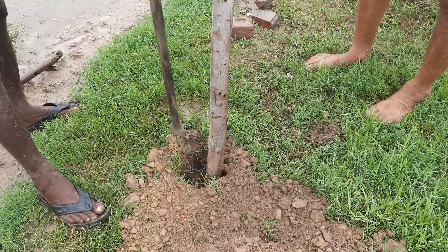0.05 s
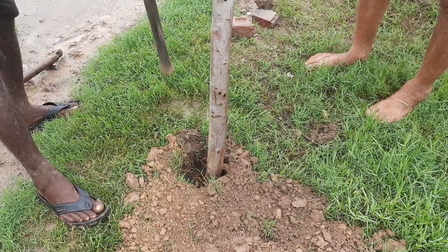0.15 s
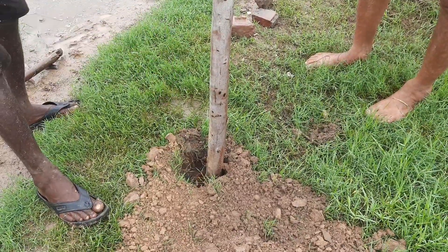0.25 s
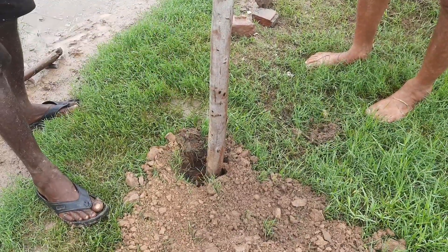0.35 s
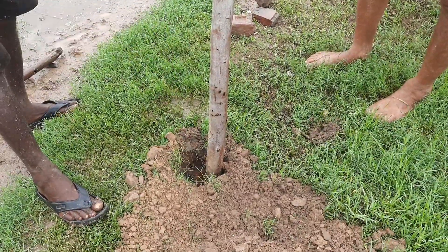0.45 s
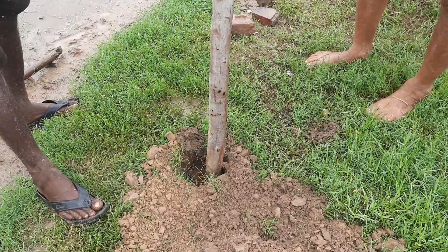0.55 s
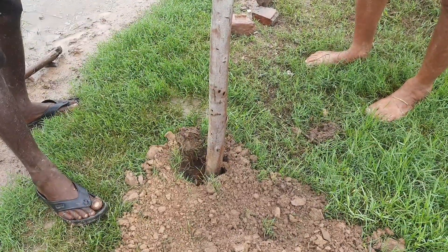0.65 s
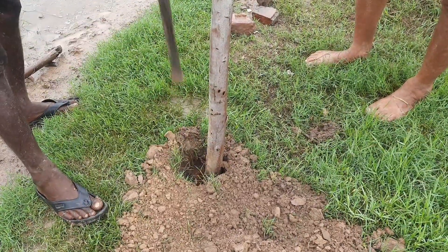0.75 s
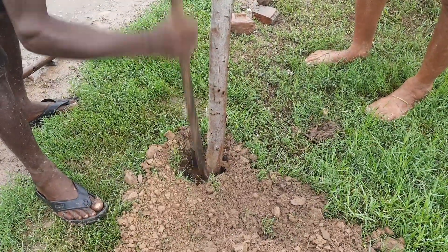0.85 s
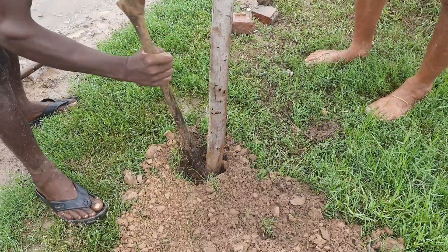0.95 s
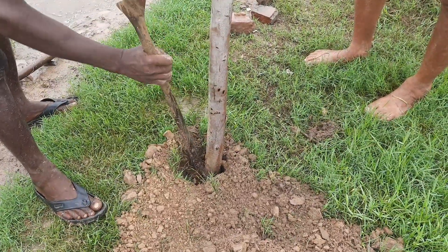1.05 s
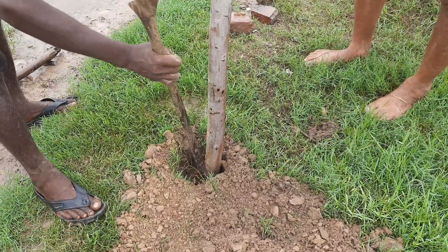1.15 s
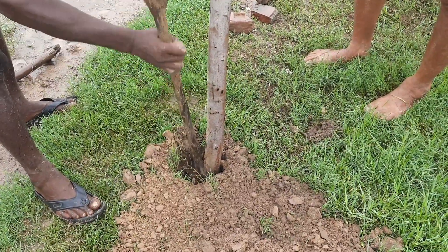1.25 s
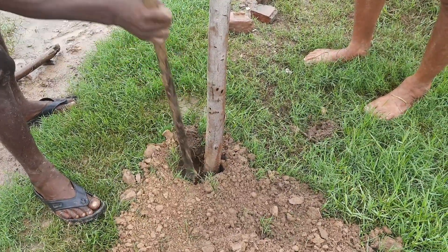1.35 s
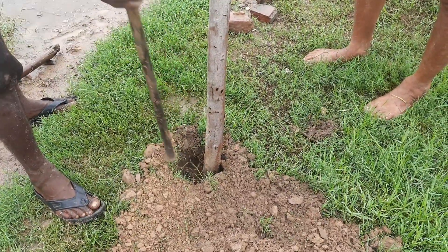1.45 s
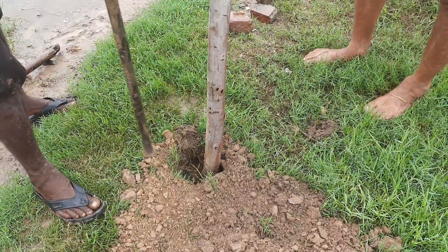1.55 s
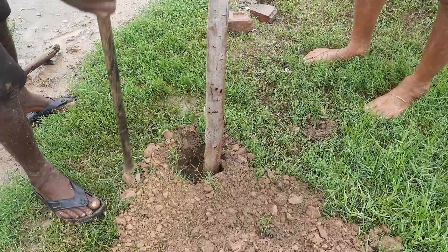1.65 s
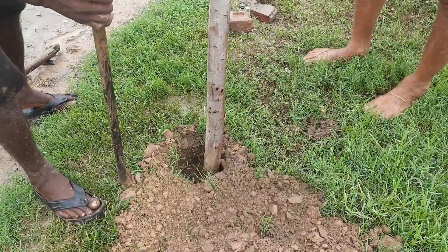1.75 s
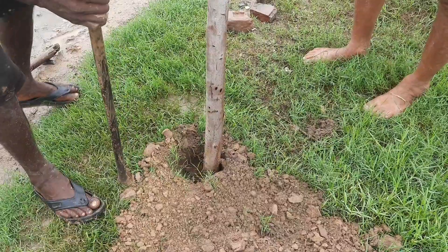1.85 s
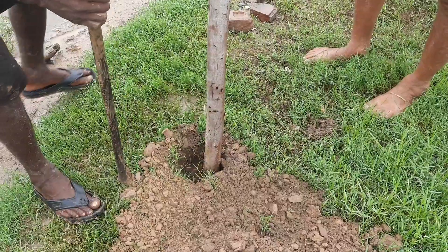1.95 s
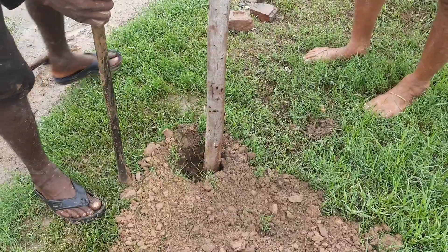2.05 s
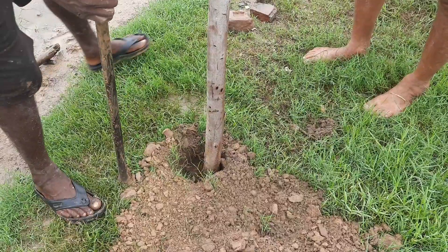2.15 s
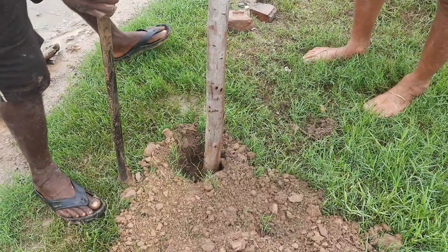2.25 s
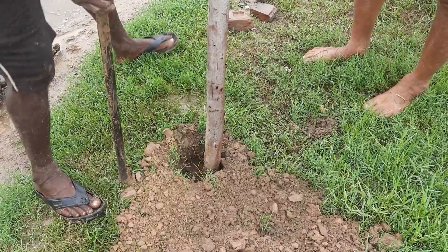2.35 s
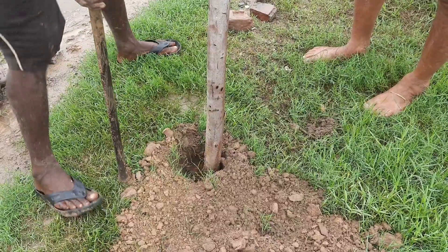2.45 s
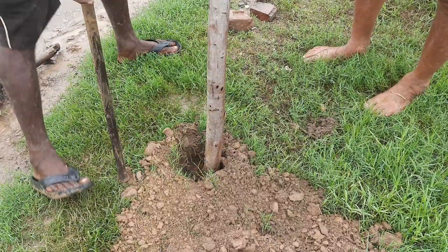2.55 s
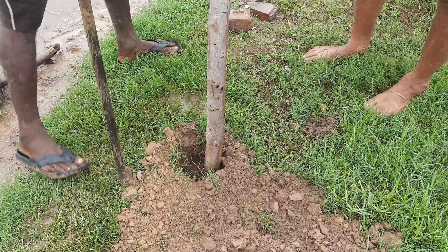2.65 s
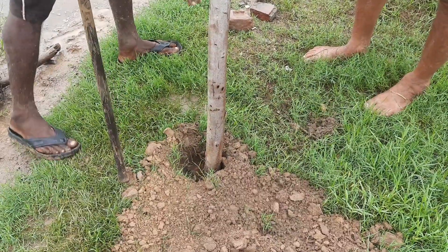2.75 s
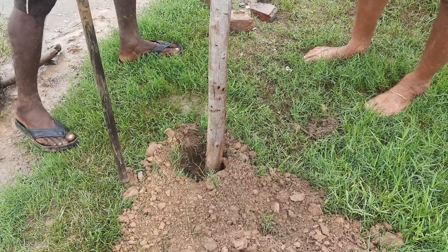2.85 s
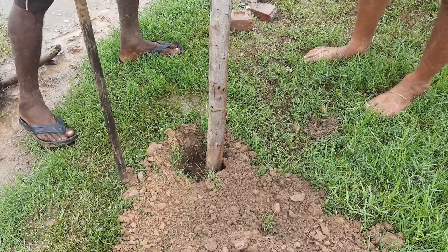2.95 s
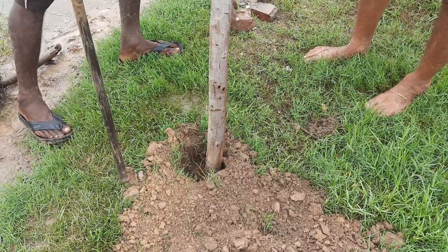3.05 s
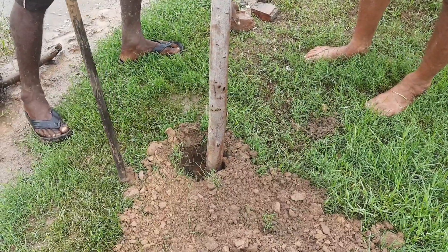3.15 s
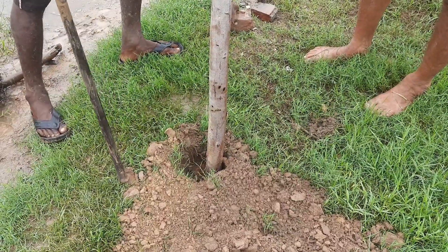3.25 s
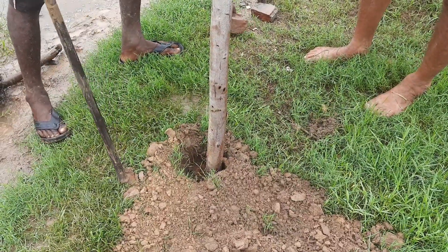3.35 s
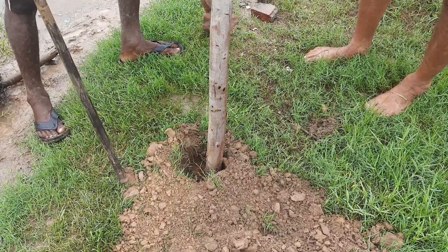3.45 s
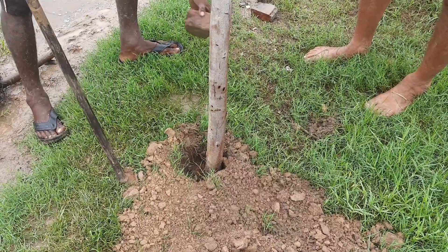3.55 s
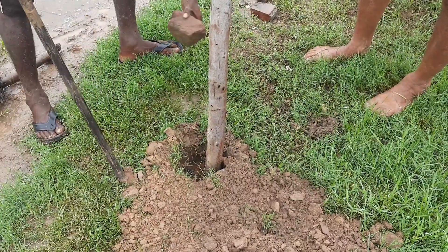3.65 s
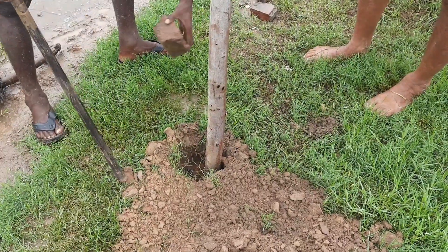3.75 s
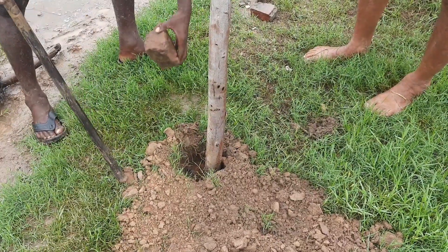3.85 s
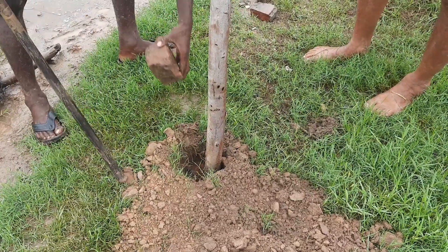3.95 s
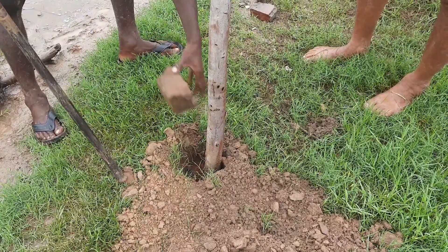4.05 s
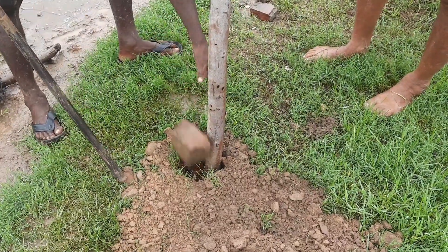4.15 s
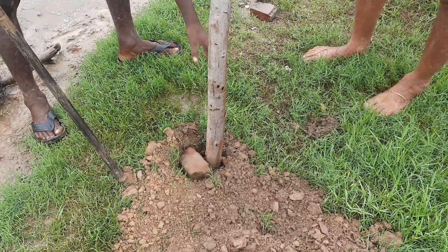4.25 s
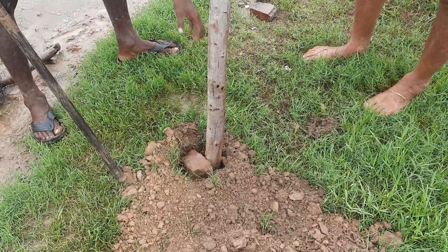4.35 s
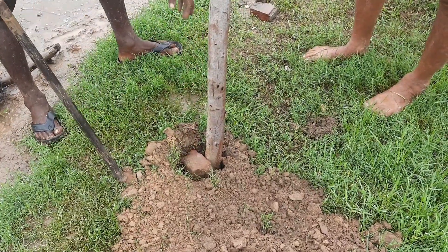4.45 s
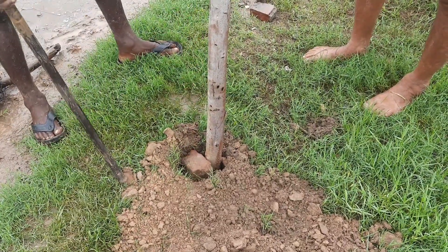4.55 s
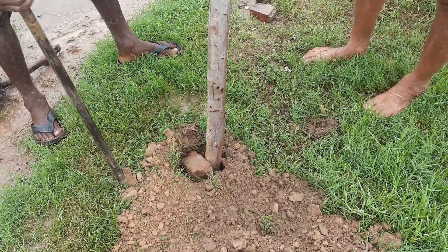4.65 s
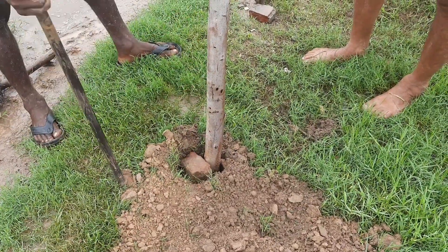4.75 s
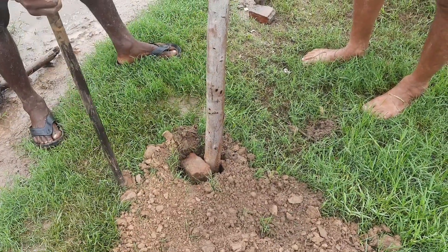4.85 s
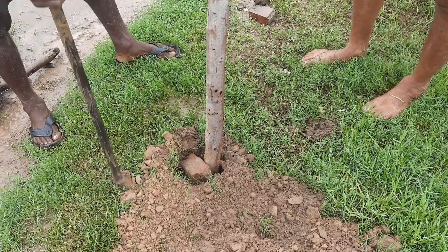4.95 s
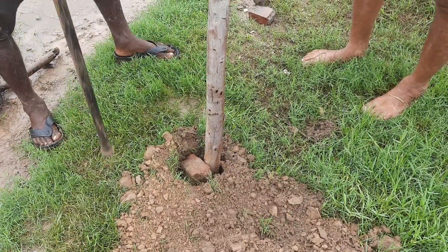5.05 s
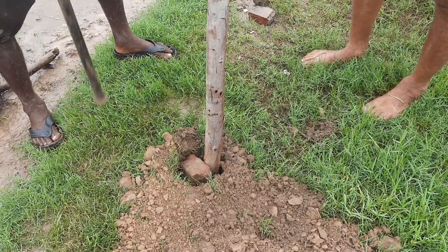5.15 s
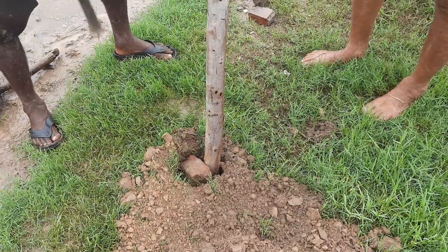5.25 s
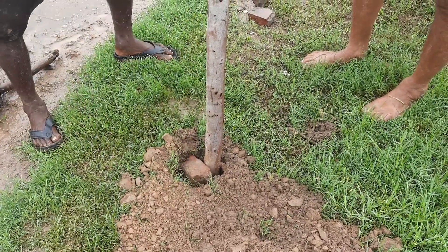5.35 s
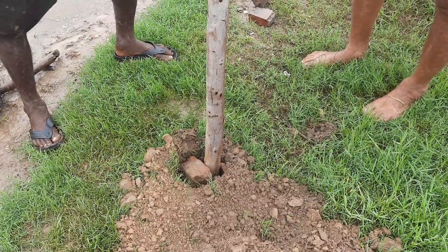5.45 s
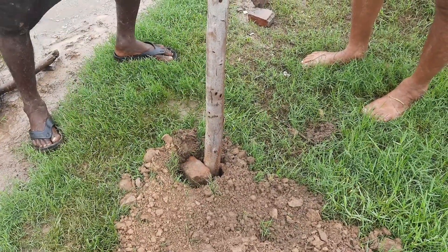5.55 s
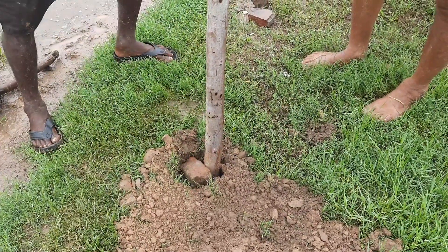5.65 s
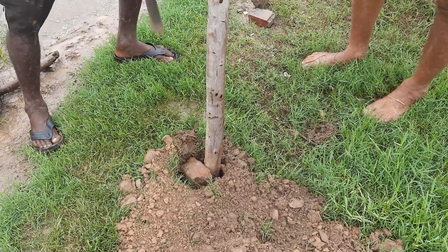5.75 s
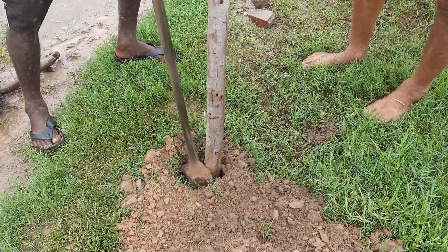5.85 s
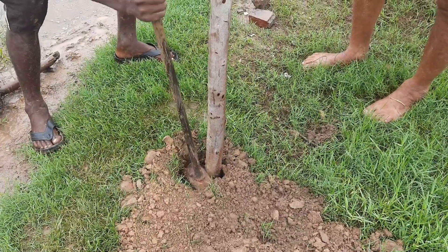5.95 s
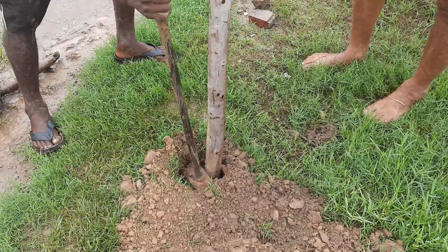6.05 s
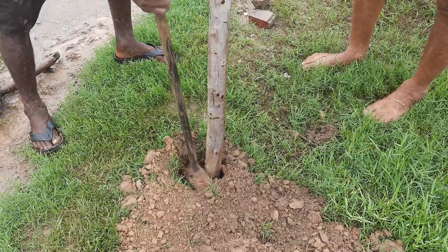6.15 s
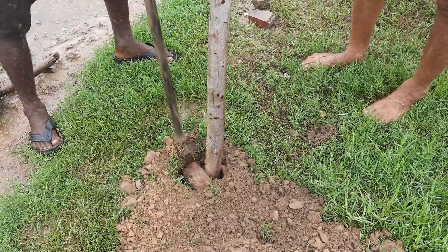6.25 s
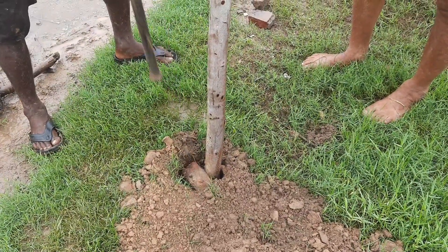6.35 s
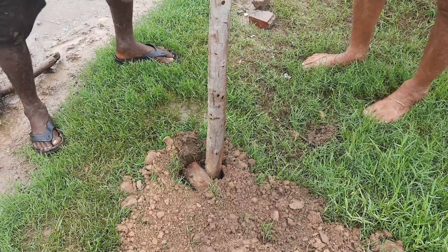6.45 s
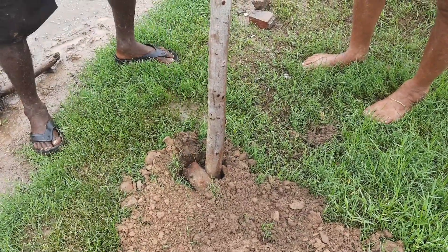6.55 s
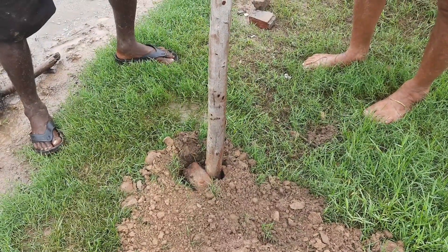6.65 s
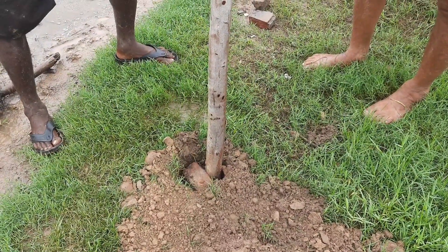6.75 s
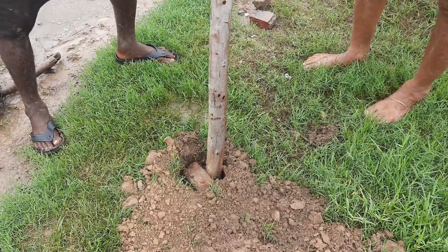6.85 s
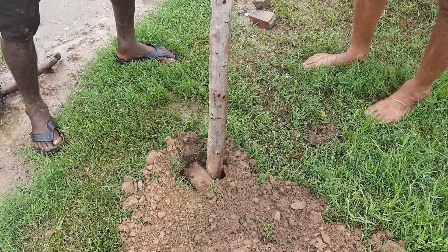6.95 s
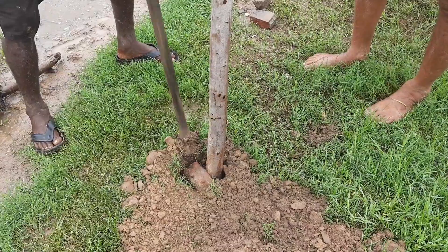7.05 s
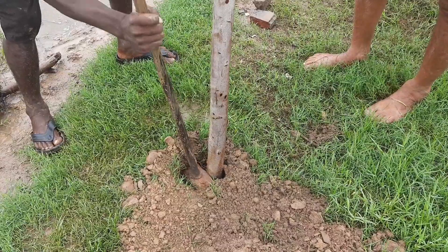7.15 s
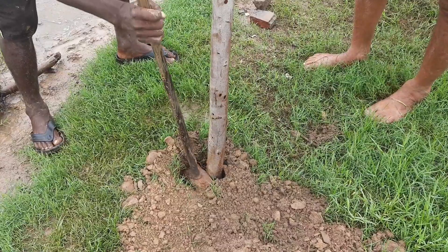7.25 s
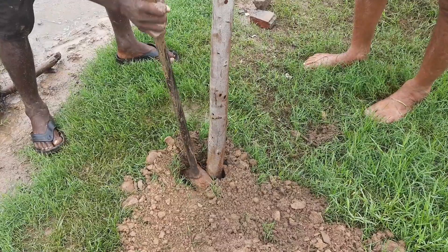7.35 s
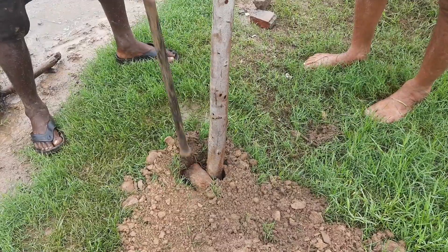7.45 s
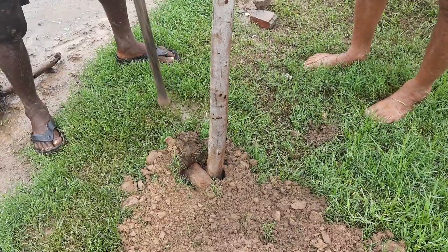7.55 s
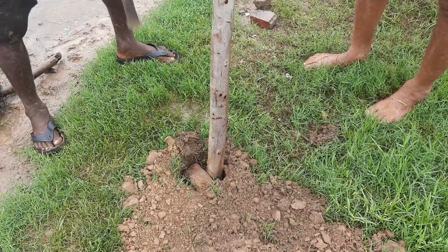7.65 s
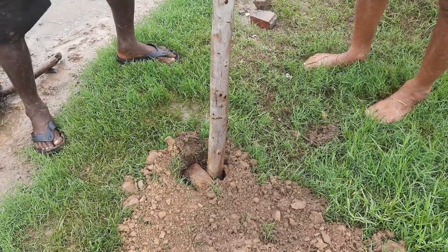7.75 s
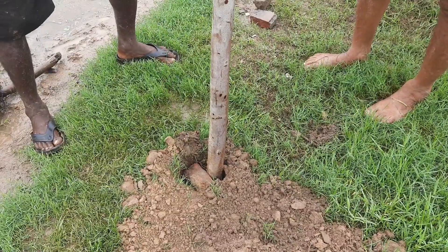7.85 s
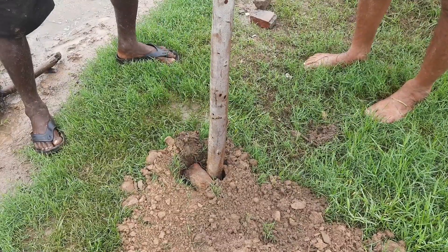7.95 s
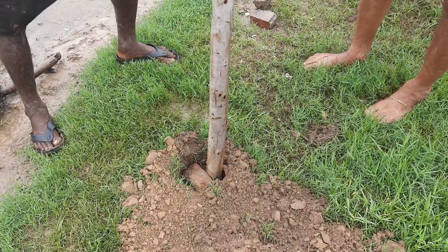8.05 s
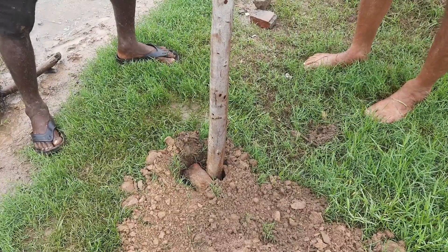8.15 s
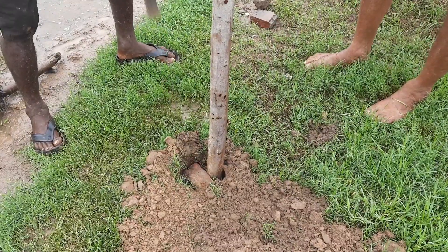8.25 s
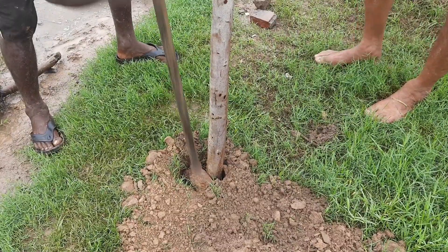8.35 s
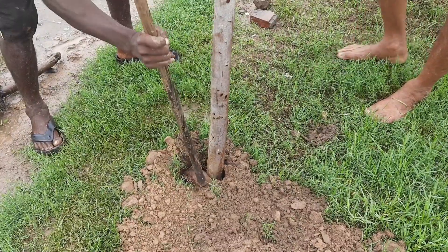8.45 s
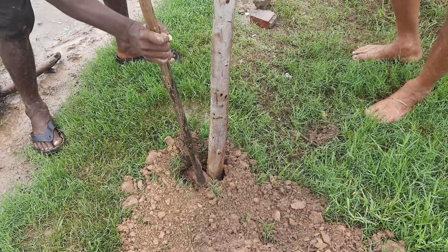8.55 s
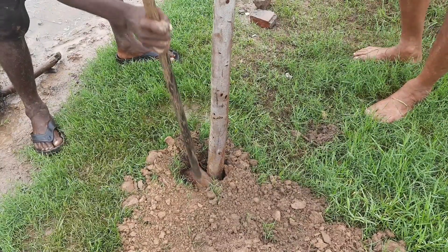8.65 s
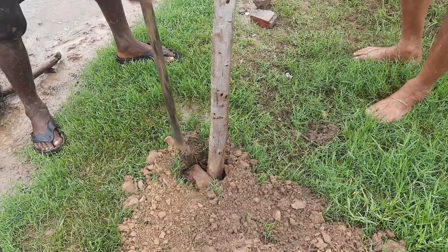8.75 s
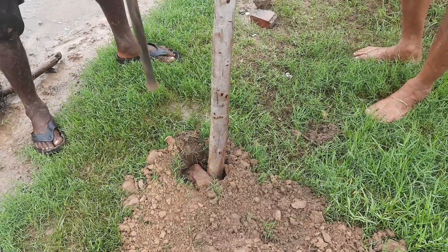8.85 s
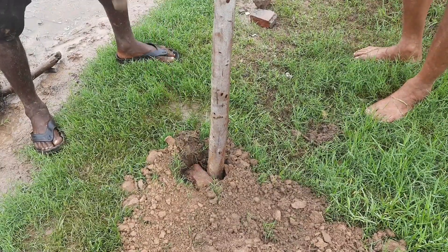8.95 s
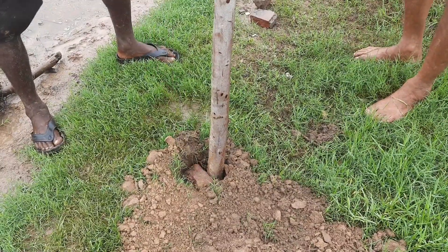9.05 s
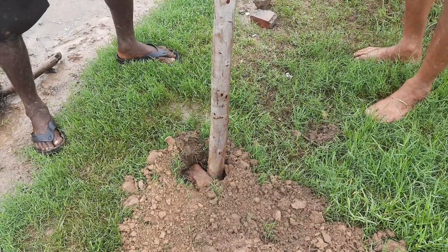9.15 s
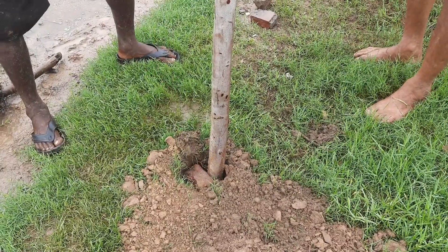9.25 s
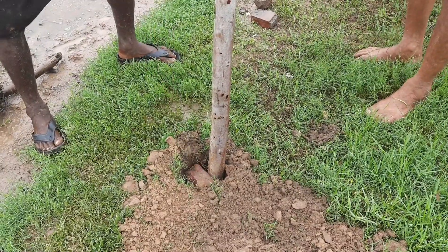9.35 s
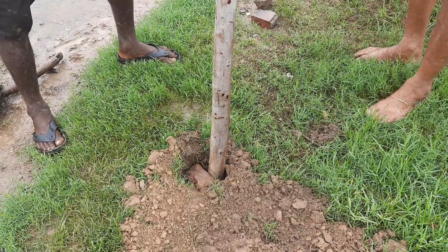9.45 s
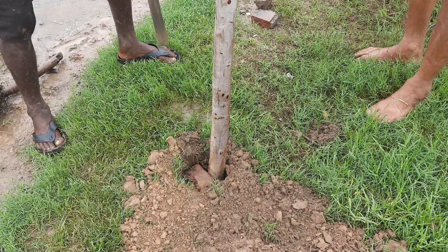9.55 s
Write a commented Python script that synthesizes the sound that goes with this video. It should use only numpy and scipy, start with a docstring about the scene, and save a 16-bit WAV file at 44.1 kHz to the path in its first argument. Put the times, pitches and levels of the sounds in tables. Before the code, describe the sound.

Close to the microphone on an open grassy field, a bird's short, nasal, arched alarm calls repeat about every 0.4 seconds from start to end, near 1.2 kHz with bright overtones. Light grass rustle and scuffs open the scene. At 0.95 an iron bar rams into soil: a deep thump, gritty crunch and short bright ring. Between about 1.7 and 4 feet brush the turf, low rumble swells near 3, and a thin far whistle sinks from 2.7 to 3.7. At 4.3 a brick drops into the hole with a hollow knock and grit; a hoarse distant cry sounds nearby in time. Grass rustles briefly around 5. Harder, stonier blows land at 5.96, 7.19 and 8.46, each with a double-bite crack, a quickly damped metallic ring, crumbling soil and a faint field echo. Fine insect shimmer and quieter rumble continue to about 9.6.

```python
"""Ramming a post hole in a grassy field

Close by, an iron bar is rammed four times: first into soil, then onto a lump of brick dropped in between.
Decaying sines make the ground thump, the stone crack and the hand-damped bar ring; shaped noise makes grit,
crumbs and the rustling grass. A bird's sharp alarm calls are gliding overtones; farther off are cries, thin notes,
a whistle and insects. Low rumble lies under everything, and the field scatters back blows and birds."""
import sys
import numpy as np
from scipy import signal
from scipy.fft import rfft, irfft, next_fast_len
from scipy.io import wavfile
from scipy.ndimage import map_coordinates

SR = 44100
rng = np.random.default_rng(int(sys.argv[2]) if len(sys.argv) > 2 else 0)


def transcribe(signal):
    """Save signal, clipped to [-1, 1], as a 16-bit WAV file at the path in sys.argv[1]."""
    frames = np.atleast_2d(signal).T
    limited = np.clip(frames, -1, 1)
    pcm = np.round(limited * 32767).astype(np.int16)
    wavfile.write(sys.argv[1], SR, pcm)


N = 423801

# blows of the bar, layer levels before the hole's ear balance: start_s, thump_db, ground_heave_db, crack_db,
# crunch_db, crumbling_db (against the crunch), ring_db, ring_length_factor, ring_tilt_db_per_octave,
# freest_mode_hz, its_boost_db, rebound_delay_s, rebound_db
BLOWS = [(0.9552, -11, -29, -19.5, -12.5, -32, -18, 0.56, 5.5, 5294, 3, .0075, -6),
         (5.9604, -10, -23, -9.5, -15, -20, -24.5, 1, -4.5, 3665, 14.5, .0085, -7),
         (7.1876, -9, -15, -8.5, -20, -19, -22.5, 1, 2.5, 6109, 1, 0.0032, -15),
         (8.4621, -6.5, -17.5, -11, -13.5, -15.5, -21.5, 1.0, -5, 5009, 1, .003, -9)]


def amp(db):
    """Decibels to gain."""
    return 10 ** (np.asarray(db) / 20)


def unit(x):
    """Scale to rms 1."""
    return x / np.sqrt(np.mean(x ** 2) + 1e-20)


def fade(t, t60):
    """Exponential decay, 60 dB down after t60 seconds."""
    return np.exp(-np.log(1000) * t / t60)


def along(points, hz):
    """Interpolate (Hz, value) points on a log frequency axis."""
    f, v = np.transpose(points)
    return np.interp(np.log(hz + 1), np.log(f + 1), v)


def curves(rows):
    """One value per sample for each column after the time."""
    s, *cols = np.transpose(rows)
    return [np.interp(np.arange(N) / SR, s, c) for c in cols]


def wobble(rate, size=N):
    """A smooth random curve, rate knots a second."""
    knots = rng.standard_normal(int(size * rate / SR) + 4)
    return map_coordinates(knots, [np.arange(size) * rate / SR])


def held(start, length, attack, release):
    """An envelope that swells up to its start, holds, then dies away."""
    t = np.arange(N) / SR - start
    return np.exp(np.minimum(t, 0) / attack - np.maximum(t - length, 0) / release)


def filtered(x, response):
    """Apply a response of frequency to x."""
    n = x.shape[-1]
    m = next_fast_len(n + 4096)
    return irfft(rfft(x, m) * response(np.fft.rfftfreq(m, 1 / SR)), m)[..., :n]


def noise(spectrum, size=N):
    """Coloured stereo noise of rms 1, nearly mono in the low middle."""
    # likeness of the two ears: pitch_hz, correlation
    alike = [(30, .1), (70, .4), (140, .85), (300, .95), (1000, .7), (3000, .45), (8000, .3), (13000, .45)]

    def mid_side(hz):
        turn = np.arccos(np.clip(along(alike, hz), -1, 1)) / 2
        return amp(along(spectrum, hz)) * [np.cos(turn), np.sin(turn)]

    mid, side = filtered(rng.standard_normal((2, size)), mid_side)
    return unit(np.array([mid + side, mid - side]))


def add(track, s, sound):
    """Mix a sound into a track at time s."""
    i = max(round(s * SR), 0)
    track[..., i:i + sound.shape[-1]] += sound[..., :N - i]


def ramming(lead=0.0015, lead_db=-14, crush_t60=0.055, drag_db=-51, rebound_grit_db=-3):
    """The bar slides past the rim; its tip grazes, hits, and bites again, crushing grit that then crumbles."""
    # packed soil around the hole, before the stiffening factor: pitch_hz, level_db, t60_s
    soil = [(179, -16.5, .05), (336, 2.5, 0.036), (406.7, -3, 0.049), (508, -5, 0.042), (696, -14, 0.029)]
    # ground heaving under the blow, before the random pitch of each ear: pitch_hz, level_db, t60_s
    ground = [(63, -3, 0.14), (108, -7.5, 0.23)]
    # stone under the tip, before a small random pitch factor: pitch_hz, level_db, t60_s
    stone = [(796, -3.5, 0.022), (1170, 1.5, 0.0063), (1508, -0.5, .028), (2257, 1, 0.022),
             (3135, -2.5, 0.014)]
    # spectrum of crushed grit: pitch_hz, relative_level_db
    crunch = [(100, -37), (300, -3.5), (800, 1.5), (1500, 0), (2300, -9.5), (2800, -10), (4500, -4),
              (8000, -15.5), (9800, -25.5), (12000, -16.5), (16000, -25)]
    # spectrum of the bar sliding past the rim: pitch_hz, relative_level_db
    drag = [(200, -19.5), (700, -10), (1400, -9), (2100, -3), (3000, -13.5), (7500, -7.5), (10000, -18.5),
            (12500, -13.5), (16000, -20)]
    # spectrum of loose earth falling back: pitch_hz, relative_level_db
    crumbs = [(150, -15.5), (400, -5.5), (1100, -9), (2200, -2.5), (2900, -7), (4500, -12.5), (7000, -12.5),
              (10000, -25.5), (16000, -25.5)]
    stiffening = 1.04  # pitch factor: soil stiffens under the tip
    drag_t60, crumble_t60, grain_db = .3, .23, 5.5
    out, t = np.zeros((2, N)), np.arange(SR // 2) / SR
    n = len(t)
    for (s, thump_db, heave_db, crack_db, crunch_db, crumble_db, ring_db,
         length, tilt_db, free_hz, free_db, rebound, rebound_db) in BLOWS:
        # the drag swells as the bar gathers speed
        add(out, s - n / SR, amp(drag_db) * fade(t, drag_t60)[::-1] * noise(drag, size=n))
        graze = fade(t, 0.018) * noise(crunch, size=n)
        add(out, s - lead, amp(crunch_db + lead_db) * graze)

        thump = knock(soil, t, stiffening, rise=0.0009)
        heave = np.array([knock(ground, t, rng.uniform(.8, 1.2), rise=.01) for ear in range(2)])
        add(out, s, amp(thump_db) * thump + amp(heave_db) * heave)
        ring = bar_ring(t, length, tilt_db, free_hz, free_db) + weak_modes(t, length, tilt_db)
        add(out, s, amp(ring_db) * ring)

        # the hit, then the second bite
        for delay, db, grit_db in [(0, 0, 0), (rebound, rebound_db, rebound_grit_db)]:
            crush = fade(t, crush_t60) * (1 - np.exp(-t / 0.00017))
            grit = crush * amp(grain_db * wobble(700, size=n)) * noise(crunch, size=n)
            crack = knock(stone, t, rng.normal(1, .015), rise=.0004)
            add(out, s + delay, amp(db) * (amp(crack_db) * crack + amp(crunch_db + grit_db) * grit))

        clumps = unit(amp(2 * wobble(500, size=n) + wobble(70, size=n)))
        crumbling = fade(t, crumble_t60) * clumps * noise(crumbs, size=n)
        add(out, s, amp(crunch_db + crumble_db) * crumbling)
    return out


def knock(modes, t, pitch, rise):
    """Damped modes set going by one push, each level a little different each time."""
    ring = 0
    for k, (hz, db, t60) in enumerate(modes):
        level = amp(db + rng.normal(0, 1))
        ring += (-1) ** k * level * fade(t, t60) * np.sin(2 * np.pi * hz * pitch * t)
    return ring * (1 - np.exp(-t / rise))


def bar_ring(t, length, tilt_db, free_hz, free_db):
    """Bending waves build up along the bar; the hand damps all but the mode with a node under the grip."""
    # modes of the bar, before each blow's tilt, boost and length factors: pitch_hz, level_db, t60_s
    bar = [(1540, -4.5, .11), (2262, -5.5, .1), (3091, -6.5, .14), (3180, -6, .12), (3249, -8, .13),
           (3665, -14, .17), (4015, -4.5, .1), (4175, 1.5, .14), (5009, -4, .12), (5294, -3.5, .12),
           (5413, -6, .11), (6109, 4, .115), (6467, -9, .19), (7105, -1, .13), (7304, -1, .12),
           (7860, -14, .12), (8584, -11, .11), (8837, -15, .18), (10620, -20, .14), (11370, -15, .08),
           (12420, -13, .13), (13700, -20, .13)]
    rise, free_length = .008, 1.3  # s, length factor of the freest mode
    ring = np.zeros((2, len(t)))
    freest = np.argmin([abs(hz - free_hz) for hz, _, _ in bar])
    for k, (hz, db, t60) in enumerate(bar):
        free = k == freest
        level = db + tilt_db * np.log2(hz / 5000) + free * free_db + rng.normal(0, 1.5)
        # contact with the soil blurs the pitch a little
        blur = .25 * wobble(150, size=len(t))
        phase = rng.uniform(0, 2 * np.pi) + rng.normal(0, .6, (2, 1)) + blur
        decay = fade(t, t60 * length * free_length ** free)
        ring += amp(level) * decay * np.sin(2 * np.pi * hz * t + phase)
    return ring * (1 - np.exp(-t / rise))


def weak_modes(t, length, tilt_db, db=-19, t60=0.033, count=36):
    """The flattened tip and uneven shaft add many faint modes between the strong ones."""
    hz = np.exp(rng.uniform(np.log(1200), np.log(14000), (count, 1)))
    level = db + tilt_db * np.log2(hz / 5000) - 9 * (hz > 9000)
    phase = rng.uniform(0, 2 * np.pi, (count, 1)) + rng.normal(0, .7, (2, count, 1))
    ring = np.sum(amp(level) * np.sin(2 * np.pi * hz * t + phase), axis=1)
    return ring * fade(t, t60 * length) * (1 - np.exp(-t / .004))


def hole_thumps(puff_db=-17):
    """The hollow of the hole answers the dropped brick and three bar blows with a low note and a puff of noise."""
    # low thumps in the hole, the brick dropping in and the deep body of three bar blows:
    # start_s, level_db, pitch_hz, t60_s
    thumps = [(0.956, -4.5, 175, 0.032), (4.2255, -31, 298.7, 0.07), (4.3066, 2, 366.6, 0.03),
              (4.3201, -3, 357.6, 0.046), (5.9603, -11.5, 278.5, 0.063), (8.465, -19, 130.5, 0.11)]
    # spectrum of the puff: pitch_hz, relative_level_db
    puff_spectrum = [(80, -14.5), (250, 1.5), (600, -0.5), (1050, -4), (1500, -24), (4000, -47)]
    earth_wall = [(160.2, -28.5, .14)]  # answers each thump: pitch_hz, level_db, t60_s
    out, t = np.zeros((2, N)), np.arange(SR // 4) / SR
    for s, db, hz, t60 in thumps:
        note = np.sin(2 * np.pi * hz * t) * (1 - np.exp(-t / 0.002))
        puff = noise(puff_spectrum, size=len(t)) * (1 - np.exp(-t / 0.00057))
        add(out, s, amp(db) * fade(t, t60) * (note + amp(puff_db) * puff))
        add(out, s, amp(db) * knock(earth_wall, t, 1, rise=.004))
    return out


def grass(shuffle_db=-8, blades_db=1.0, fine_db=7):
    """Shifting feet and the rising bar brush the turf: a coarse shuffle and blades rustling in fine grains."""
    # feet shifting on the turf and the bar being lifted through the grass, before the layer gains:
    # start_s, length_s, grass_db, fine_hiss_db
    brushes = [(0.0, .36, -64, -65.5), (1.659, .34, -80, -70.5), (2.332, 1.33, -60.5, -69.5),
               (2.645, 0.5, -56, -61.5), (4.129, 0.69, -67, -71.5), (5.025, 0.18, -51.5, -58.5),
               (5.78, .1, -67, -69)]
    # faint steady rustle of the field, before the layer gains: time_s, level_db
    stir_points = [(0, -66.5), (6.0, -67.5), (6.7, -78), (9.6, -74.5)]
    # spectrum of the coarse shuffle: pitch_hz, relative_level_db
    shuffle = [(300, -26), (800, -12), (1300, -0.5), (2000, 3), (3000, 1.5), (4500, -27), (8000, -37.5)]
    # spectrum of rustling blades: pitch_hz, relative_level_db
    blades = [(1500, -27.5), (3000, -2.5), (4300, -1), (6000, -1), (7700, 4.5), (9400, -2), (10200, -19),
              (14000, -49)]
    # spectrum of the fine hiss: pitch_hz, relative_level_db
    hiss = [(5000, -36), (9500, -7), (11000, -3.5), (12500, -1.5), (16000, -2.5)]
    attack, release = 0.078, 0.11  # s
    lift_delay, lift_length, lift_db = 0.097, 0.5, -68.5  # s, s, dB
    stir_fine_db, lift_fine_db = -9, -3  # fine hiss against the coarse rustle
    stir_db, = curves(stir_points)
    stir = amp(stir_db)
    brushing, fine_brushing = np.zeros((2, N))
    for s, length, db, hiss_db in brushes:
        swell = held(s, length, attack, release)
        brushing += amp(db) * swell
        fine_brushing += amp(hiss_db) * swell
    # the bar is drawn back up through the grass after each blow
    lifts = amp(lift_db) * sum(held(blow[0] + lift_delay, lift_length, attack, release) for blow in BLOWS)
    coarse = np.linalg.norm([stir, brushing, lifts], axis=0)
    fine = np.linalg.norm([amp(stir_fine_db) * stir, fine_brushing, amp(lift_fine_db) * lifts], axis=0)
    grains = unit(amp(2.4 * wobble(600) + .6 * wobble(25)))
    body = amp(shuffle_db) * noise(shuffle) + amp(blades_db) * noise(blades)
    return grains * (coarse * body + amp(fine_db) * fine * noise(hiss))


def scuffs(grain_db=1.5):
    """Short grainy swells as soles, hands and crumbs slide."""
    # scuffs and crumbs of soil, before the ear balance: middle_s, level_db, rise_and_decay_constant_s
    slides = [(0.225, -45.5, 0.005), (0.352, -50.5, .035), (0.858, -48.5, .003), (0.872, -47, 0.013),
              (1.301, -52, .035), (1.79, -48, .03), (1.975, -58.5, 0.018), (2.463, -44.5, 0.023),
              (4.228, -42.5, .004), (4.296, -36, 0.013), (4.322, -45.5, .003), (4.363, -46.5, 0.0089),
              (5.837, -52.5, .008), (7.442, -54.5, 0.032)]
    # spectrum of sliding grit: pitch_hz, relative_level_db
    grit = [(300, -12.5), (1000, -10.5), (2500, -5), (4500, -2.5), (7500, 4), (10000, -9), (12500, -2),
            (16000, -8)]
    t = np.arange(N) / SR
    swell = sum(amp(db) * np.exp(-np.abs(t - s) / length) for s, db, length in slides)
    return swell * unit(noise(grit) * amp(grain_db * wobble(1000)))


def alarm_bird(jitter=0.011, flutter_db=3, odd_fade_db=14, upper_swell_db=5, hoarse_db=-18):
    """Arched nasal calls open with a slight rasp and strong odd overtones, then clear and brighten."""
    # alarm calls, before the ear balance: middle_s, top_pitch_hz, level_db, odd_overtones_db
    calls = [(0.125, 1096, -53, -15), (0.475, 1189, -52.5, -9.5), (0.857, 1127, -49, -2.5),
             (1.228, 1157, -50, -4), (1.668, 1187, -53.5, 2.5), (2.054, 1173, -47.5, -4.5),
             (2.484, 1174, -48, -4), (2.882, 1181, -44, -10), (3.311, 1186, -44, -10),
             (3.697, 1195, -42, -7), (4.092, 1205, -44.5, -1.5), (4.518, 1203, -45.5, -4),
             (4.883, 1218, -46, -4), (5.244, 1185, -49.5, -0.5), (5.667, 1216, -47.5, -2.5),
             (6.10, 1232, -51.5, -8.5), (6.548, 1218, -52, 0), (6.934, 1220, -54.5, 3),
             (7.385, 1192, -50, 2), (7.838, 1229, -52, 2), (8.287, 1193, -56.5, 2.5),
             (8.717, 1257, -49.5, -2.5), (9.30, 1166, -49, -17)]
    # overtones from the fundamental up, before the colouring of each call: level_db
    overtones = [-27, 1, -3.5, -1, -9.5, -6.5, -18]
    # course of one call: time_from_middle_s, pitch_factor, level_db
    call_shape = [(-.037, .9, -35), (-.029, .95, -8), (-.016, .988, -3), (0, 1, 0), (.015, .988, -2),
                  (.026, .94, -9), (.036, .87, -32)]
    # brightness of the overtones from the fourth up: time_s, level_db
    brightness = [(0.4, -12.5), (1.2, 0.5), (3.7, -4), (4.1, 1), (6.9, 1.5), (7.4, -10), (7.8, -9),
                  (8.3, 1), (9.3, -9)]
    rasp = .022  # fraction of the pitch
    out = np.zeros((2, N))
    when, bend, swell = np.transpose(call_shape)
    t = np.arange(when[0], when[-1], 1 / SR)
    n = len(t)
    # the rasp is strongest at the opening and returns weaker at the very end
    rasping = np.clip(t / when[0], 0, 1) + np.clip(t / when[-1], 0, 1) ** 4 / 2
    for s, hz, db, odd_db in calls:
        upper_db = np.interp(s, *np.transpose(brightness)) + upper_swell_db * t / when[-1]
        slant = rng.normal(0, .35) * t
        unsteady = jitter * wobble(250, size=n) + rasp * rasping * wobble(820, size=n)
        pitch = hz * (np.interp(t, when, bend) + slant + unsteady)
        phase = 2 * np.pi * np.cumsum(pitch) / SR
        for k, level in enumerate(overtones, 1):
            colour = level + upper_db * (k > 3) + (k % 2) * (odd_db - odd_fade_db * t / when[-1])
            # the bounce off the ground gives each ear its own strength and phase
            ear_db, ear_phase = rng.normal(0, 1.8, (2, 1)), rng.normal(0, .7, (2, 1))
            course_db = np.interp(t, when, swell) + flutter_db * wobble(90, size=n)
            gain = amp(db + colour + ear_db + course_db)
            hoarse = 1 + amp(hoarse_db) * wobble(1200, size=n)
            add(out, s + when[0], gain * hoarse * np.sin(k * phase + ear_phase))
    return out * amp([[-1.5], [1.5]])


def distant_birds(attack=.03, release=0.058, waver=.024):
    """Hoarse cries of shaped noise and thin wavering sine notes, blurred by distance."""
    # hoarse cries of distant birds: start_s, length_s, level_db
    cry_times = [(0.067, 0.31, -70), (1.337, 0.24, -69.5), (4.082, 0.2, -59.5)]
    # spectrum of a cry: pitch_hz, relative_level_db
    cry = [(1000, -44), (1450, -14), (1750, -9), (2100, -4), (2450, -17.5), (3200, -46)]
    # faint notes of distant birds: start_s, length_s, pitch_hz, sag_hz_per_s, level_db
    far_notes = [(1.37, 0.24, 3170, 0.5, -72), (3.2, 0.24, 2236, 653.5, -61), (3.22, 0.23, 1480, 301, -70),
                 (6.2, .52, 3220, -0.5, -75), (6.2, .65, 1950, 61.5, -77)]
    t = np.arange(N) / SR
    cries = sum(amp(db) * held(s, length, attack, release) for s, length, db in cry_times) * noise(cry)
    drift = 1 + waver * wobble(200)
    notes = 0
    for s, length, hz, sag, db in far_notes:
        pitch = (hz - sag * (t - s)) * drift
        tone = np.sin(2 * np.pi * np.cumsum(pitch) / SR)
        notes += amp(db) * held(s, length, attack, release) * tone
    return cries + notes * amp(3.7 * wobble(30))


def far_bird():
    """One thin whistle, a sine that mostly sinks in pitch."""
    # a far bird's long whistle: time_s, pitch_hz, level_db
    whistle = [(2.68, 2990, -84), (2.76, 2840, -50.5), (2.9, 2700, -66), (3.2, 2724, -64.5),
               (3.55, 2653, -68), (3.8, 2720, -78)]
    hz, db = curves(whistle)
    t = np.arange(N) / SR
    singing = (t > whistle[0][0]) & (t < whistle[-1][0])
    phase = 2 * np.pi * np.cumsum(hz * (1 + .004 * wobble(80))) / SR
    return singing * amp(db + 2.5 * wobble(30)) * np.sin(phase)


def insects(db=-77):
    """A thin, high, shimmering chorus in the grass, made of narrow noise."""
    # spectrum of the chorus: pitch_hz, relative_level_db
    chorus = [(3000, -49.5), (8300, -24.5), (9000, -4), (9500, -4), (9900, -21), (11000, -59)]
    swell_db = 2.5 * wobble(1.5) + 1.5 * wobble(60)
    return amp(db + swell_db) * noise(chorus)


def rumble():
    """Low, slightly restless outdoor air, made of bass noise."""
    # course of the rumble: time_s, level_db
    air = [(0.0, -51.5), (0.99, -54), (1.15, -56), (2.27, -52), (3.07, -46.5), (5.29, -50), (5.64, -48),
           (6.23, -54.5), (6.71, -57.5), (9.6, -56.5)]
    # spectrum of the rumble: pitch_hz, relative_level_db
    low_air = [(13, -47), (22, -23), (35, -10.5), (53, 1), (108, 0), (178, -7.5), (214, -7), (320, -10),
               (494, -28.5), (594, -36), (777, -33), (1070, -40), (1200, -43), (1560, -53.5), (2640, -120)]
    level_db, = curves(air)
    return amp(level_db + 0.56 * wobble(9)) * noise(low_air)


def field(x):
    """Diffuse scatter from ground, plants and walls, each frequency dying at its own speed."""
    # decay of the scatter: pitch_hz, t60_s
    scatter = [(100, .35), (350, .3), (800, .4), (2000, .28), (5000, .24), (14000, .14)]
    hz, t, z = signal.stft(rng.standard_normal((2, SR // 2)), SR, nperseg=256)
    tail = signal.istft(z * fade(t, along(scatter, hz)[:, None]), SR, nperseg=256)[1]
    tail = tail * (1 - np.exp(-np.arange(tail.shape[1]) / SR / 0.015))
    return signal.fftconvolve(x, tail / np.linalg.norm(tail[0]), axes=1)[:, :N]


def far_echo(x, t60=2.0):
    """A dull answer from far across the field: a slowly decaying noise tail one second long."""
    # spectrum of the answer: pitch_hz, relative_level_db
    answer = [(100, -17.5), (400, 0), (800, 2.5), (1200, -12.5), (2500, -4.5), (6000, -26.5),
              (14000, -52.5)]
    t = np.arange(SR) / SR
    tail = noise(answer, size=SR) * fade(t, t60) * (1 - np.exp(-t / 0.071))
    return signal.fftconvolve(x, tail / np.linalg.norm(tail[0]), axes=1)[:, :N]


def scene():
    """Work at the hole close by, birds and insects farther off, grass and air all round."""
    # ear balance of sound from the hole: pitch_hz, left_minus_right_db
    lean = [(100, 1), (400, 0.5), (1000, -1), (1600, 3.5), (3100, 3), (4200, -6), (6100, -7.5), (8700, -14),
            (10500, -2.5), (14000, -1)]
    # phase lead of the left ear for sound from the hole: pitch_hz, lead_rad
    lead = [(60, -0.5), (150, 0), (450, 0), (850, 0.6), (2000, 0), (3000, 0), (5000, 1.1), (8000, 1.1),
            (16000, 0)]
    ears = np.array([[1], [-1]]) / 2
    rustle_lag = .00018  # s: the rustle reaches the right ear first

    def from_hole(hz):
        return amp(ears * along(lean, hz)) * np.exp(1j * ears * along(lead, hz))

    def from_right(hz):
        return np.exp(-2j * np.pi * hz * ears * rustle_lag)

    blows = filtered(ramming(), from_hole)
    work = blows + filtered(hole_thumps(), from_hole)
    birds = alarm_bird() + far_bird() + distant_birds()
    underfoot = filtered(grass() + scuffs(), from_right)
    rustle = (underfoot + insects()) * amp([[-1.8], [1.8]])
    scattered = field(amp(-25.5) * blows + amp(-13) * birds)
    echoes = scattered + far_echo(amp(-48.5) * blows)
    return work + birds + rustle + rumble() + echoes


def record(dry):
    """The recorder thins the deepest bass, rounds off the highest peaks and cuts all above its band limit."""
    top, band_limit_hz = .95, 15900
    thinned = signal.sosfilt(signal.butter(2, 32, "highpass", fs=SR, output="sos"), dry)
    rounded = thinned / (1 + np.abs(thinned / top) ** 6) ** (1 / 6)
    return filtered(rounded, lambda hz: hz < band_limit_hz)


dry = scene()
out = record(dry)
transcribe(out)
```